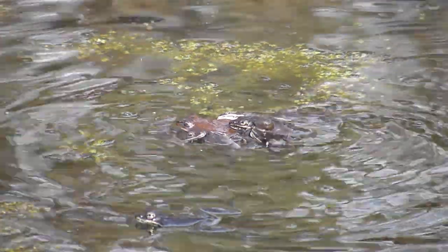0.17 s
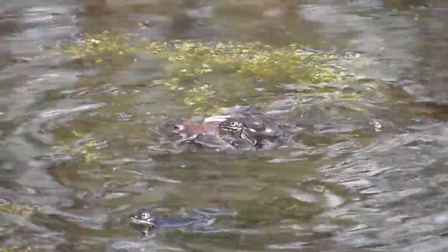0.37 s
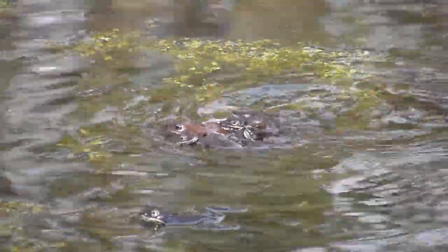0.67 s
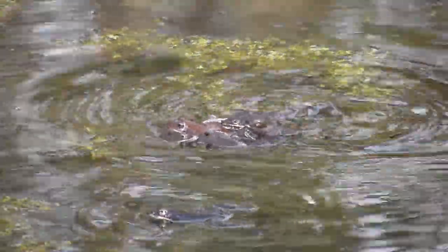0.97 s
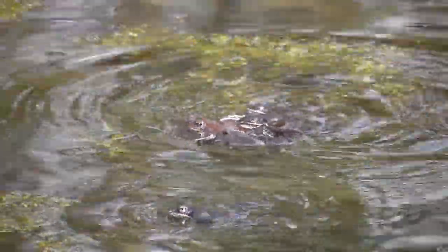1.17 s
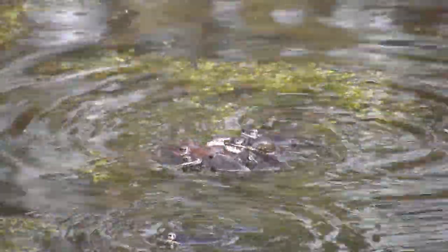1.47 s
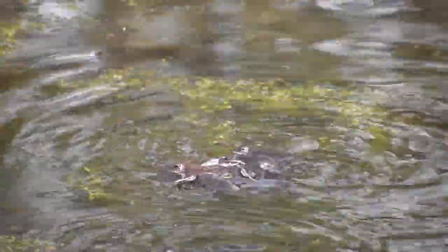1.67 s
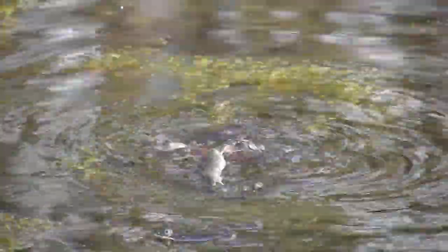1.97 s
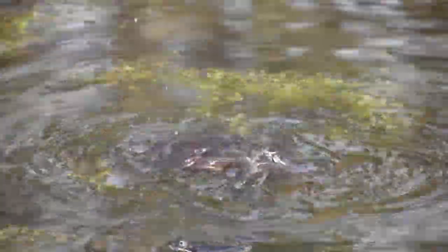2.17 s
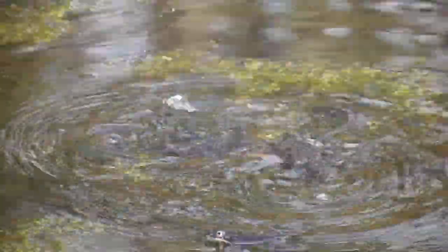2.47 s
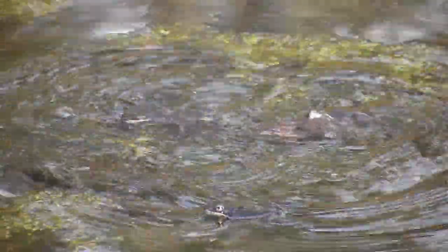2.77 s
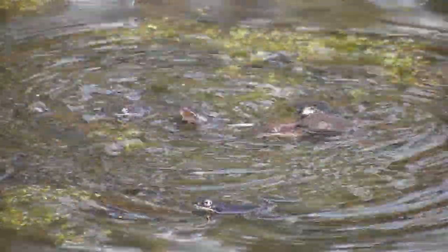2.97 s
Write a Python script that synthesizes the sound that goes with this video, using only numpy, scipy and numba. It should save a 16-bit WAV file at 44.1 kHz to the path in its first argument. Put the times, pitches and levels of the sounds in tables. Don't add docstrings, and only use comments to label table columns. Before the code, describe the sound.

Frogs croaking in a pond, overlapping quick nasal quacks over a blurred distant chorus and hiss.

```python
import sys
import numpy as np
from scipy import signal
from scipy.fft import rfft, irfft
from scipy.io import wavfile
from numba import njit

SR = 44100
rng = np.random.default_rng(int(sys.argv[2]) if len(sys.argv) > 2 else 0)


def unload_wav(signal):
    wavfile.write(
        sys.argv[1],
        SR,
        np.round(np.clip(np.atleast_2d(signal).T, -1, 1) * 32767).astype(np.int16),
    )


def nominal_scale(level):
    x = np.asarray(level, float) / 20
    return 10 ** x


N = 137151

# frequency [Hz], density [dB per Hz].
AIR_SPECTRUM = [(30, -106), (70, -69.5), (180, -68), (500, -73.5), (2000, -76.5), (6000, -99),
                (16000, -100)]
# middle [s], level [dB].
AIR_BUMPS = [
    (0.245, -26),
    (0.532, -33),
    (0.771, -39),
    (0.831, -26),
    (1.251, -36),
    (1.419, -30.5),
]
# time [s], level [dB].
CROWD_SWELL = [
    (.2, -35),
    (.4, -30),
    (.6, -29.5),
    (.8, -39),
    (1.1, -36.5),
    (1.5, -29.5),
    (1.75, -40.5),
    (2.1, -35),
    (2.4, -40),
    (2.8, -35),
]
# start [s], peak level [dB].
TICKS_ON_WATER = [
    (1.776, -49),
    (1.8353, -3.5),
    (2.012, -40),
    (2.049, -34),
]
# frequency [Hz], level [dB], decay time T60 [s].
SNAP_MODES = [(720, -1, 0.0058), (1600, 7.5, 0.0054), (3000, -2, 0.0063), (7540, 1.5, 0.005),
              (9430, 18, 0.0024), (11500, 16.5, 0.002), (15300, -30, 0.0033)]
# middle [s], length [s], level [dB], centre frequency [Hz], bandwidth [Hz].
SPATTER = [
    (1.793, 0.056, -54, 8350, 5070),
    (2.04, 0.1, -54.5, 10200, 5030),
]
# time [s], pitch [Hz], level [dB].
LONG_WHISTLE = [
    (.85, 2430, -52),
    (.88, 2470, -46),
    (.97, 2470, -43),
    (1.04, 2340, -45),
    (1.075, 2180, -54),
]
SHORT_WHISTLE = [
    (.51, 2470, -50),
    (.54, 2390, -44),
    (.575, 2270, -49),
]
BRIEF_PEEP = [
    (1.852, 2430, -40),
    (1.862, 2420, -34),
    (1.872, 2380, -42),
]
# loudest moment [s], level [dB], length [s], resonance [Hz].
THROAT_SQUEAKS = [
    (.204, -39.5, .027, 3120),
    (.422, -34, 0.023, 3210),
    (1.31, -33.5, 0.043, 2860),
    (1.412, -32.5, 0.027, 3320),
    (1.532, -33, 0.019, 2770),
    (1.462, -28, 0.037, 3404),
    (1.57, -36.5, 0.00443, 2900),
    (2.168, -40, 0.029, 2850),
    (2.242, -37.5, 0.013, 2910),
]
# loudest moment [s], level [dB], length [s], resonance [Hz].
MOUTH_RASPS = [(0.152, -33.5, 0.025, 4010), (0.198, -43.5, 0.02, 4800), (0.274, -39.5, 0.005, 5070),
               (0.307, -35.5, 0.005, 5100), (0.492, -46, 0.015, 4600), (0.368, -46, 0.012, 5130),
               (0.452, -42, 0.03, 4480), (0.68, -39.5, 0.025, 5270), (0.996, -44, 0.025, 4700),
               (1.08, -49, 0.019, 5750), (1.163, -43, 0.039, 4560), (1.304, -47, 0.08, 4520),
               (1.512, -54, 0.019, 5200), (1.794, -40, 0.031, 4800), (1.843, -42, 0.016, 4630),
               (1.915, -61, 0.014, 5250), (2.186, -58, 0.008, 5800), (2.207, -39.5, 0.016, 4150),
               (2.236, -39, 0.019, 5100), (2.28, -44, 0.027, 4620), (2.672, -57, 0.0091, 4700),
               (2.742, -46, 0.0099, 5100), (2.836, -46.5, 0.02, 4600), (2.97, -44, 0.048, 4430)]
# loudest moment [s], level [dB], length [s], click rate [Hz], main sac resonance [Hz].
FIRST_CROAKS = [(0.149, -16.5, 0.022, 409.6, 1413), (0.197, -26, 0.019, 458, 1780),
                (0.27, -31, 0.017, 507, 1600), (0.318, -19.5, 0.016, 425.4, 1596),
                (0.366, -29.5, 0.036, 357, 1620), (0.4315, -22, 0.02, 410, 1350),
                (0.465, -22.5, 0.022, 407, 1240), (0.494, -19.5, 0.022, 419, 1640),
                (0.535, -32, 0.028, 416, 1340), (0.568, -40, 0.018, 400, 1500),
                (0.593, -27, 0.03, 396.5, 1350), (0.645, -31, 0.04, 419, 1470),
                (0.692, -24, 0.019, 374.4, 1640), (0.86, -31.5, 0.03, 385.6, 910),
                (0.988, -32, 0.042, 367.5, 1410), (1.083, -24.5, 0.024, 436.4, 1480),
                (1.166, -22.5, 0.012, 421, 1640)]
MIDDLE_CROAKS = [(1.182, -23, 0.017, 416, 1524), (1.251, -30.5, 0.013, 458, 1880),
                 (1.297, -25.5, 0.019, 439, 1800), (1.318, -20, 0.021, 375, 1410),
                 (1.405, -21.5, 0.03, 410.3, 1670), (1.46, -17.5, 0.015, 415, 1840),
                 (1.479, -18, 0.018, 407.4, 1580), (1.497, -21, 0.01, 396, 1600),
                 (1.508, -21.5, 0.01, 402, 1460), (1.522, -18, 0.014, 374.4, 1630),
                 (1.647, -28.5, 0.024, 499, 1580), (1.707, -34, 0.022, 450, 960),
                 (1.803, -27.5, 0.029, 411, 1520), (1.856, -17.5, 0.017, 398, 1637),
                 (1.894, -24.5, 0.038, 419, 1530), (1.924, -31, 0.012, 395, 1470),
                 (1.976, -29, 0.021, 421.3, 1460), (2.039, -24.5, 0.018, 353, 1610),
                 (2.159, -21, 0.018, 370, 1694)]
LAST_CROAKS = [(2.208, -23.5, 0.022, 458, 1460), (2.235, -26, 0.017, 431, 1740),
               (2.272, -26, 0.028, 425, 1440), (2.293, -27, 0.02, 415, 1600),
               (2.327, -27.5, 0.015, 434, 1350), (2.427, -33.5, 0.034, 502, 1480),
               (2.472, -30, 0.016, 414, 1440), (2.505, -24.5, 0.018, 333, 1590),
               (2.53, -21.5, 0.022, 429, 1506), (2.583, -27.5, 0.026, 460, 1530),
               (2.613, -25.5, 0.023, 387, 1650), (2.669, -22.5, 0.015, 436, 1260),
               (2.709, -24, 0.016, 390, 1440), (2.727, -31, 0.012, 404, 1510),
               (2.7505, -16.5, 0.018, 519.7, 1520), (2.837, -19.5, 0.011, 380.4, 1508),
               (2.874, -30, 0.039, 463, 1430), (2.955, -28, 0.014, 401, 1370),
               (2.982, -27, 0.028, 378, 1530), (3.01, -22, 0.019, 421.6, 1220)]
CLEAR_CROAKS = [.494, 1.182, 1.48, 1.857, 2.1585, 2.8385]
FACING_CROAKS = [.318, .692, 1.081, 1.522, 2.038, 2.16, 2.208, 2.613, 2.669, 2.751]

START_RATE_HZ, SPEED_UP = 190, .12
BODY_STARTS = .45
LEAD_DB, LEAD_DB_PER_S, EDGE_DB, LENGTH_SCALE = -9, 260, -6.5, .95
JITTER, SCATTER_DB = .028, 1.8
VOICE_FLOOR_HZ, VOICE_TOP_HZ = 520, 6000
SAC_SAG, RASP_SAG, SQUEAK_SAG, RATE_SAG = .07, .04, .19, .12
LOW_SAC_SHARE, LOW_SAC_DB, LOW_T60_S = 1.9, -7.5, .0095
SAC_T60_S, CLEAR_RING, CLEAR_REST_DB = .0105, 2.4, -7
THROAT_HZ, THROAT_DB, THROAT_T60_S = 2800, -13.5, .0035
MOUTH_HZ, MOUTH_DB, MOUTH_T60_S = 4850, -24, .008
BRIGHT_LEAD_DB, FACING_DB = 12, 5
RASP_RATE_HZ, RASP_T60_S = 300, .012
SQUEAK_RATE_HZ, SQUEAK_T60_S = 390, .013
CROWD_SPREAD_DB, CROWD_RASP_DB, CROWD_WET_DB = 2.5, -22, -3
POND_T60_S, POND_DB = .4, -15
TICK_RISE_S = .00045
BUMP_S, BUMP_HZ = .016, 136
CALM_S, CALM_DB = 1.4, -6
NOTCH_HZ, NOTCH_WIDTH_HZ, TOP_HZ = 7860, 240, 15900
OPENS_S = .1365


def band(x, hz, width):
    return signal.lfilter(*signal.iirpeak(hz, hz / width, fs=SR), x)


def air(t):
    hz = np.fft.rfftfreq(N, 1 / SR) + 1
    corner_hz, density_db = np.array(AIR_SPECTRUM).T
    shape = nominal_scale(np.interp(np.log(hz), np.log(corner_hz), density_db))
    out = irfft(rfft(rng.standard_normal(N)) * shape * np.sqrt(SR / 2), N)
    rumble = signal.sosfilt(signal.butter(1, 200, fs=SR, output="sos"), out)
    out -= rumble * (t > CALM_S) * (1 - nominal_scale(CALM_DB))
    for s, db in AIR_BUMPS:
        swell = np.exp(-((t - s) / BUMP_S) ** 2)
        out += nominal_scale(db) * swell * np.sin(2 * np.pi * BUMP_HZ * (t - s))
    return out


def pond(x):
    t = np.arange(SR // 2) / SR
    tail = rng.standard_normal(len(t)) * nominal_scale(-60 * t / POND_T60_S) * (t > .004)
    return signal.fftconvolve(x, tail / np.linalg.norm(tail))[:N]


def crowd(count=170):
    when = rng.uniform(0, N / SR, count)
    own = rng.standard_normal((count, 6)).clip(-2, 2).T
    db = CROWD_SPREAD_DB * own[0]
    low = croaks(np.c_[when, db, .024 + .005 * own[1], 400 + 35 * own[2], 1500 + 170 * own[3]])
    rasps = np.c_[when, db + CROWD_RASP_DB, .03 + .005 * own[4], 4850 + 320 * own[5]]
    thin = single(rasps, RASP_RATE_HZ, RASP_T60_S, RASP_SAG)
    wet = low + thin + nominal_scale(CROWD_WET_DB) * pond(low + thin)
    s, swell_db = np.array(CROWD_SWELL).T
    return wet / wet.std() * nominal_scale(np.interp(np.arange(N) / SR, s, swell_db))


def water(t):
    out = np.zeros(N)
    for s, db in TICKS_ON_WATER:
        since = np.clip(t - s, 0, 1)
        ring = sum(nominal_scale(g - 60 * since / t60) * np.sin(2 * np.pi * hz * since) for hz, g, t60 in SNAP_MODES)
        out += nominal_scale(db) / 2 * (1 - np.exp(-since / TICK_RISE_S)) * ring
    for s, length, db, hz, width in SPATTER:
        grains = rng.standard_normal(N) * nominal_scale(1.5 * rng.exponential(size=N))
        grains = band(band(grains, hz, width), hz, width)
        out += nominal_scale(db) * grains / grains.std() * np.exp(-(2 * (t - s) / length) ** 4)
    return out


def bird(t, notes):
    s, hz, db = np.array(notes).T
    phase = 2 * np.pi * np.cumsum(np.interp(t, s, hz)) / SR
    return np.sqrt(2) * nominal_scale(np.interp(t, s, db, -140, -140)) * np.sin(phase)


@njit
def voices(calls, modes, luck, sag, size):
    half = 3000
    out = np.zeros(size + 2 * half + 2000)
    for c in range(len(calls)):
        peak, gain, length, rate = calls[c]
        buf, phase, k = np.zeros(2 * half), 0., 1
        u = np.arange(-half, half) / SR / length
        speeding = np.clip(u + SPEED_UP + 1, 0., 1.) ** 2
        step = (START_RATE_HZ + (rate - START_RATE_HZ) * speeding) * (1 - RATE_SAG * np.clip(u, 0., 2.)) / SR
        first = half - int(BODY_STARTS * length * SR)
        phase = -step[:first].sum() % 1
        z = np.zeros(modes.shape[1], np.complex128)
        for i in range(2 * half):
            v = u[i]
            phase += step[i] * (1 + JITTER * luck[c, k] * (i > first))
            kick = 0.
            if phase >= 1:
                phase, k = phase - 1, k + 1
                db = 4 * EDGE_DB * v * v
                if -1.7 < v < 0:
                    db = LEAD_DB + LEAD_DB_PER_S * v * length if i < first - 2 else db / 4
                kick = 10 ** ((db + SCATTER_DB * luck[c, k + 80]) / 20)
            for m in range(len(z)):
                hz = modes[c, m, 0] * (1 - sag * min(max(v, -1.5), 1.5))
                turn = np.exp(complex(-np.log(1000) / modes[c, m, 2], 2 * np.pi * hz) / SR)
                z[m] = z[m] * turn + kick * (modes[c, m, 3] if v < -.6 else 1.)
                buf[i] += modes[c, m, 1] * z[m].imag
        gain /= np.sqrt(np.mean(buf[half - 250:half + 250] ** 2)) + 1e-9
        at = int(peak * SR)
        out[at:at + 2 * half] += gain * buf
    return out[half:half + size]


def sing(calls, modes, sag):
    calls = np.array(calls, float) * [1, 1, LENGTH_SCALE, 1]
    calls[:, 1] = nominal_scale(calls[:, 1])
    luck = rng.standard_normal((len(calls), 200))
    x = voices(calls, np.array(modes, float), luck, float(sag), N)
    body = signal.butter(3, [VOICE_FLOOR_HZ, VOICE_TOP_HZ], "band", fs=SR, output="sos")
    return signal.sosfilt(body, x)


def single(rows, rate_hz, t60, sag):
    calls = [(s, db, length, rate_hz) for s, db, length, _ in rows]
    x = sing(calls, [[(r[3], 1, t60, 1)] for r in rows], sag)
    middle = np.mean([r[3] for r in rows])
    return band(x, middle, 1.1 * middle)


def listed(s, moments):
    return np.abs(np.array(moments) - s).min() < .004


def croaks(rows):
    own = rng.standard_normal((len(rows), 3)).clip(-1.5, 1.5)
    modes = []
    for (s, _, _, rate, sac_hz), (a, b, c) in zip(rows, own):
        shine = nominal_scale(FACING_DB * listed(s, FACING_CROAKS))
        clear = listed(s, CLEAR_CROAKS)
        low_gain = nominal_scale(LOW_SAC_DB + 2 * b + clear * CLEAR_REST_DB)
        modes.append([
            (min(LOW_SAC_SHARE * rate, 980.), -low_gain, LOW_T60_S, 1),
            (sac_hz, 1, SAC_T60_S * CLEAR_RING ** clear, 1),
            (THROAT_HZ * (1 + c / 10), -shine * nominal_scale(THROAT_DB), THROAT_T60_S, 1),
            (MOUTH_HZ * (1 + a / 20), shine * nominal_scale(MOUTH_DB), MOUTH_T60_S, nominal_scale(BRIGHT_LEAD_DB))])
    return sing([r[:4] for r in rows], modes, SAC_SAG)


def scene():
    t = np.arange(N) / SR
    near = croaks(list(FIRST_CROAKS) + list(MIDDLE_CROAKS) + list(LAST_CROAKS))
    near += single(MOUTH_RASPS, RASP_RATE_HZ, RASP_T60_S, RASP_SAG)
    near += single(THROAT_SQUEAKS, SQUEAK_RATE_HZ, SQUEAK_T60_S, SQUEAK_SAG)
    frogs = near + nominal_scale(POND_DB) * pond(near) + crowd()
    whistles = sum(bird(t, notes) for notes in (LONG_WHISTLE, SHORT_WHISTLE, BRIEF_PEEP))
    return (frogs + whistles + water(t) + air(t))[None]


def roll_off(x):
    return signal.sosfilt(signal.butter(12, 17500, fs=SR, output="sos"), x)


def record(dry):
    treble = signal.sosfilt(signal.butter(2, 450, "high", fs=SR, output="sos"), dry)
    x = treble * 0.97 + 0.14 * dry
    x = x - band(x, NOTCH_HZ, NOTCH_WIDTH_HZ)
    x = signal.sosfilt(signal.ellip(10, .2, 80, TOP_HZ, fs=SR, output="sos"), x)
    opening = np.clip((np.arange(N) / SR - OPENS_S) / 0.00018, 0, 1)
    return roll_off(x * opening)


dry = scene()
out = record(dry)
unload_wav(out)
```